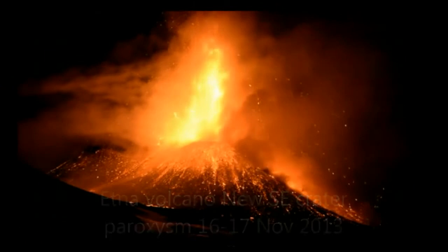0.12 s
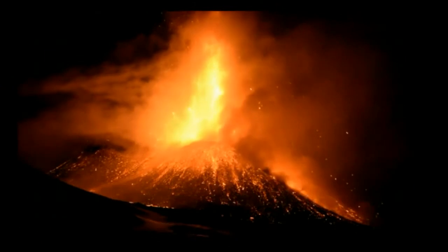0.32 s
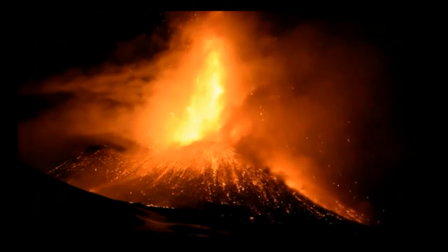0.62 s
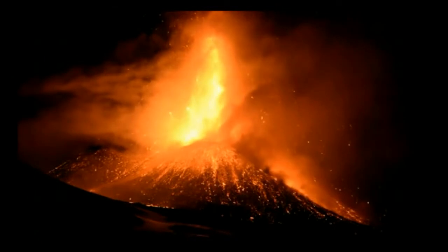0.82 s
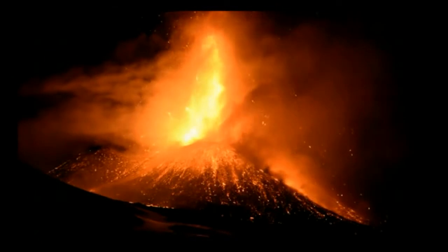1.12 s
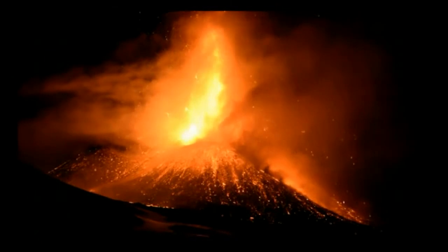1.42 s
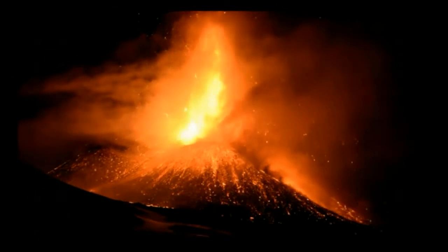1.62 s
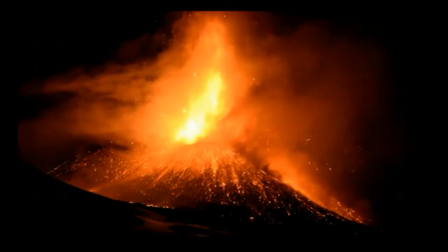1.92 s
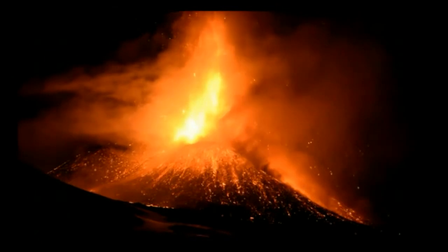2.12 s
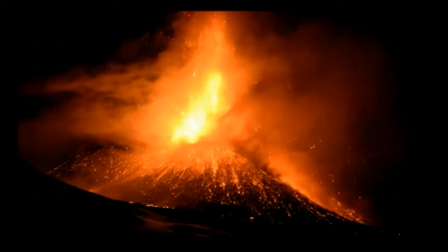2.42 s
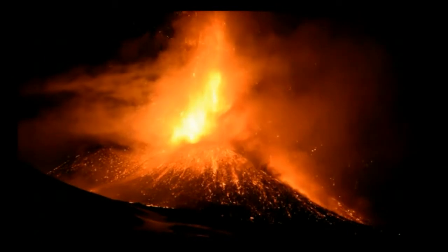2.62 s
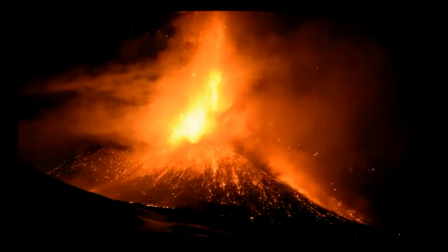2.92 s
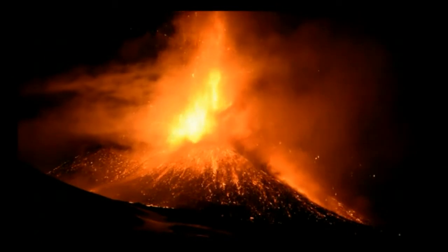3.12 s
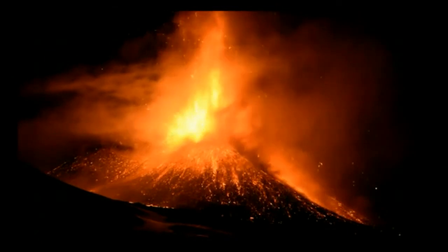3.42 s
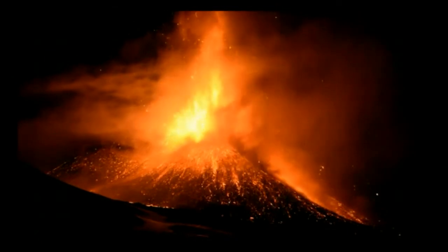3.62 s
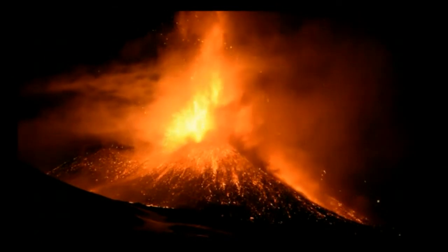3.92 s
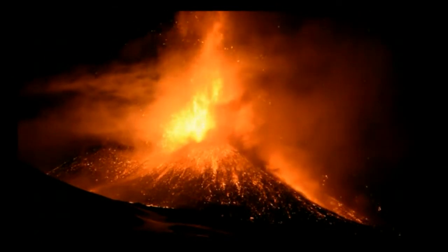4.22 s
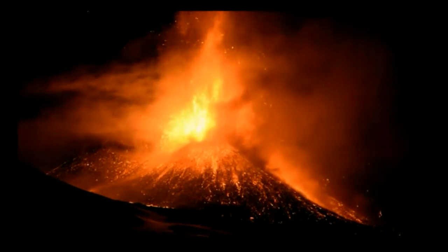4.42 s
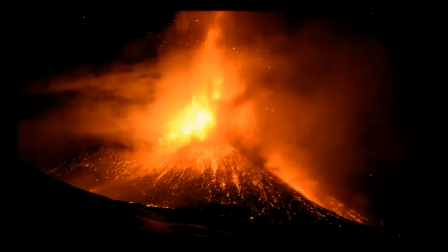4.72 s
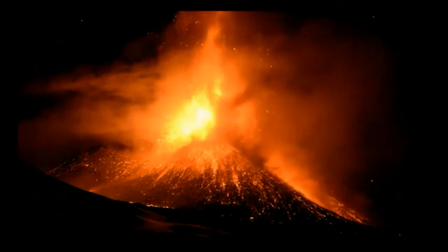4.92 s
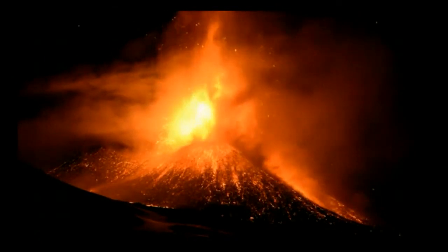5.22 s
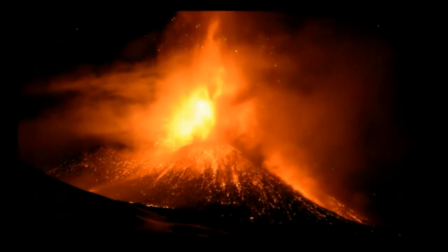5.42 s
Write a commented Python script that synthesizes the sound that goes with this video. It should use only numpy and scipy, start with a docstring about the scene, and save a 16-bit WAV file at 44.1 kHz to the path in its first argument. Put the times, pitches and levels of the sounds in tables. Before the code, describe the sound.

An open slope, with a lava fountain far off and loose cinders close to the microphone. Two or three heavy low thumps hit at once, with another at 0.14 s, over a dull throbbing rumble, faint jet and thin steady hiss. Gritty rustling, small crunches and pitched stone scrapes come at 0.3-0.7 s and around 1-1.4 s. Deep bursts strike at 1.53-1.61 s, 2.1 s, 2.4 s and 2.8 s; the strongest briefly duck everything else. A cluster at 2.98-3.01 s launches the jet into a full, hollow roar, pushing in uneven gusts, with ragged crackling rips until about 3.9 s. It then sags steadily, with lesser gusts near 4.1, 4.6 and 4.9 s. Near grit gets busier from 4.4 s, crunching brightly around 4.75-5 s. A boom at 5.19 s dips the sound; a loud, brittle crunch snaps at 5.46-5.5 s before the end.

```python
"""A lava fountain's gas jet, heard from a distant slope, roars, surges and gusts over a low rumble.
The jet is filtered noise and random clicks; bursting gas slugs send single pressure waves, some with a snap.
Close by, something gritty rustles and crunches, perhaps loose cinders: random clicks that stir short rings.
A thin hiss of filtered noise lies behind it. All but the waves dips briefly after the heaviest ones."""
import sys
import numpy as np
from scipy import signal
from scipy.fft import rfft, irfft, next_fast_len
from scipy.io import wavfile
from scipy.ndimage import uniform_filter1d

SR = 44100
rng = np.random.default_rng(int(sys.argv[2]) if len(sys.argv) > 2 else 0)


def materialize(psi):
    """Save the field psi as 16-bit PCM at rate SR to the path in sys.argv[1].

    A 1-D psi becomes a single channel; in a 2-D psi each row is a channel.
    """
    bounded = np.clip(np.atleast_2d(psi).T, -1, 1)
    quanta = np.round(bounded * 32767).astype(np.int16)
    wavfile.write(sys.argv[1], SR, quanta)


N = 246519
TIME = np.arange(N) / SR  # seconds
SURGE_DB = 10  # how far the surge lifts the jet above idle


def from_db(db):
    """Turn decibels into a gain."""
    return 10 ** (np.asarray(db) / 20)


def rms_one(x):
    """Scale a sound to an average power of one."""
    return x / np.sqrt(np.mean(x ** 2) + 1e-20)


def evened(x, span_s):
    """Divide by the local loudness, so the power stays near one from each short span to the next."""
    power = uniform_filter1d(x ** 2, int(span_s * SR) + 1)
    return x / np.sqrt(np.abs(power) + 1e-9)


def in_time(rows):
    """Read each column of a table at every sample, with straight lines between the rows."""
    seconds, *columns = np.transpose(rows)
    return [np.interp(TIME, seconds, column) for column in columns]


def drift(rate):
    """A smooth random wander of spread about 1; a higher rate changes faster."""
    step = 40  # computed on every 40th sample only, then joined by lines
    r = np.exp(-2 * np.pi * rate * step / SR)
    noise = rng.standard_normal(N // step + 2002)
    slow = signal.lfilter([1], [1, -2 * r, r * r], noise)[2000:]  # skip the filter's start
    return np.interp(np.arange(N) / step, np.arange(len(slow)), rms_one(slow))


def colour(x, spectrum):
    """Filter to a spectrum without any sound before its cause (minimum phase); white noise keeps its power."""
    size = 2 * next_fast_len(N // 2 + SR // 20, real=True)
    hz, db = np.transpose(spectrum)
    grid = np.maximum(np.arange(size // 2 + 1) * SR / size, 1)
    gain = rms_one(from_db(np.interp(np.log(grid), np.log(hz), db)))
    # folding the cepstrum forward in time gives the minimum phase
    cepstrum = irfft(np.log(gain))
    cepstrum[1:size // 2] *= 2
    cepstrum[size // 2 + 1:] = 0
    return irfft(rfft(x, size) * np.exp(rfft(cepstrum)))[:N]


def resonance(x, hz, width_hz):
    """Ring at one pitch (two poles), with gain 1 at the peak; a wider resonance dies sooner."""
    r = np.exp(-np.pi * width_hz / SR)
    top = np.array([1, 0, -1]) * (1 - r * r) / 2
    return signal.lfilter(top, [1, -2 * r * np.cos(2 * np.pi * hz / SR), r * r], x)


def grains(per_s, spread_db):
    """Random clicks of either sign and random size, scaled to unit power."""
    sizes = from_db(spread_db * np.minimum(rng.exponential(1, N), 4))
    signs = rng.choice([-1, 1], N)
    return rms_one(sizes * signs * (rng.random(N) < per_s / SR))


def burst(s, length, rise_s, fall_s):
    """An envelope that rises up to time s, holds for the length and falls."""
    age = TIME - s
    rise = np.minimum(age, 0) / rise_s
    fall = np.maximum(age - length, 0) / fall_s
    return np.exp(np.maximum(rise - fall, -20))


def surge_db(start_s=3.025, rise_s=0.17, sag_db_per_s=3):
    """The jet's strength above its idle level: a quick rise, then a steady sag."""
    age = TIME - start_s
    return SURGE_DB * np.clip(age / rise_s, 0, 1) - sag_db_per_s * np.maximum(age - rise_s, 0)


def roar(idle_db=-31, level_db=-0.5, flutter_db=0.5, pops_db=-6, even_s=0.091):
    """Turbulence mixed with countless small bursts; the air has swallowed their treble."""
    # Each row: frequency in Hz, relative strength in dB per Hz.
    spectrum = [(120, -25.5), (220, -16), (285, -2.5), (350, 1), (440, -6), (580, -9), (680, -18),
                (860, -21), (1100, -35), (1500, -53), (2500, -51.5), (9000, -70)]
    pops = from_db(pops_db) * grains(per_s=250, spread_db=3.5)
    gas = colour(rng.standard_normal(N) + pops, spectrum)
    jet_db = idle_db + surge_db() + level_db + flutter_db * drift(rate=8.1)
    return from_db(jet_db) * evened(gas, even_s)


def throat(level_db=-40.0, follows=1.51, hz=390, width_hz=200):
    """Driven hard, the jet rings the vent's throat in quick, uneven, soft-edged puffs."""
    soften = signal.butter(2, 900, fs=SR, output="sos")
    puffs = signal.sosfilt(soften, grains(per_s=150, spread_db=2.0))
    ring = resonance(resonance(puffs, hz, width_hz), hz, width_hz)
    # follows: dB of ringing per dB of surge
    return from_db(level_db + follows * surge_db()) * evened(ring, span_s=0.041)


def gusts(rise_s=0.019, fall_s=0.019, lull_db=-1.5):
    """The jet pushes in lumps and slackens between them; a gain."""
    # Gusts riding on the surge. Each row: start in seconds, length in seconds, push in dB above the lull.
    pushes = [(3.25,0.12,3.5),(3.49,0.04,2.5),(3.656,0.13,2.5),(4.14,0.049,1.5),(4.62,0.027,1.5),(4.933,0.078,2.5),(5.14,0.03,1)]
    push_db = sum(db * burst(s, length, rise_s, fall_s) for s, length, db in pushes)
    return from_db(lull_db * surge_db() / SURGE_DB + push_db)


def crackle(level_db=-61, follows=0.11, hz=950, width_hz=900):
    """Scattered small shocks in the jet crackle, louder as it surges and dulled by the air."""
    shocks = resonance(grains(per_s=90, spread_db=3.0), hz, width_hz)
    air = signal.butter(3, 2000, fs=SR, output="sos")
    return from_db(level_db + follows * surge_db()) * rms_one(signal.sosfilt(air, shocks))


def volleys(level_db=-2):
    """Now and then shocks tear out of the surge in a bunch, as a short ragged rip."""
    # Each row: start in seconds, length in seconds, level in dB before the shared level_db.
    rips = [(3.182,0.0045,-30),(3.235,0.0025,-27),(3.274,0.0038,-33),(3.311,0.0047,-36),(3.353,0.014,-33),(3.408,0.0049,-32),(3.457,0.0025,-31),(3.495,0.018,-37),(3.65,0.013,-44),(3.699,0.011,-32.5),(3.728,0.0038,-31.5),(3.752,0.0034,-33),(3.79,0.003,-36),(3.869,0.0033,-32.5),(4.149,0.0025,-31)]
    # Each row: frequency in Hz, relative strength in dB per Hz.
    spectrum = [(250, -3.5), (600, 14), (950, 4.5), (1400, -3.5), (2400, -12.5), (4000, -18.5),
                (9000, -22.5), (15000, -35)]
    force = sum(from_db(db + level_db) * burst(s, length, rise_s=0.00039, fall_s=0.0012)
                for s, length, db in rips)
    shocks = evened(grains(per_s=2500, spread_db=3.0), span_s=0.006)
    return colour(force * shocks, spectrum)


def blasts(level_db=-1, crack_db=3, crack_hz=740, crack_width_hz=720,
           snap_db=1, snap_s=0.000083, tail_db=-17, tail_s=0.00079):
    """Slugs burst: a crest between two troughs; some also crack and snap at the top, as their row says."""
    # Pressure waves. Each row: time of the crest in seconds, peak in dB, length of the crest in seconds,
    # crack in dB, snap in dB; level_db, crack_db and snap_db are added to the three levels.
    slugs = [(0.0133,-15.5,0.0023,-49,-39),(0.0176,-7.5,0.00099,-20,-40),(0.031,-14,0.001,-42,-65),(0.1439,-12.5,0.0011,-29,-44),(1.533,-8.5,0.0018,-41,-29),(1.5527,-12,0.0025,-21.5,-14.5),(1.6148,-19.5,0.0026,-50,-60),(2.094,-9.5,0.0013,-29.5,-53),(2.398,-16,0.0023,-45,-15.5),(2.7907,-16,0.0017,-47,-47),(2.9751,-12,0.0018,-43,-12.5),(2.9939,-8.5,0.0013,-23,-19.5),(3.007,-12,0.0021,-28,-29),(3.1835,-15.5,0.0024,-38,-20.5),(3.238,-20,0.0029,-42,-17.5),(4.9275,-18,0.0014,-47,-50),(5.1888,-13.5,0.0023,-26,-19)]
    # The snap's colour. Each row: frequency in Hz, relative strength in dB per Hz.
    snap_spectrum = [(1500, -4), (3200, -1.5), (5000, -6.5), (7500, -0.5), (13000, -3), (16000, 6.5)]
    waves, fronts, snaps = np.zeros((3, N))
    for s, peak_db, crest_s, front_db, top_db in slugs:
        near = np.abs(TIME - s) < .02
        age = TIME[near] - s
        u = (2 * age / crest_s) ** 2
        waves[near] += from_db(peak_db + level_db) * (1 - u) * np.exp(-u / 2)
        fronts[round(s * SR)] += from_db(front_db + crack_db) * SR / (np.pi * crack_width_hz)
        # a very short snap with a faint, longer tail, on both sides of the crest
        fade = np.exp(-np.abs(age) / snap_s) + from_db(tail_db) * np.exp(-np.abs(age) / tail_s)
        snaps[near] += from_db(top_db + snap_db) * fade
    crack = resonance(resonance(fronts, crack_hz, crack_width_hz), crack_hz, crack_width_hz)
    snap_noise = snaps * rng.choice([-1, 1], N)
    return ground_echo(waves + crack) + colour(snap_noise, snap_spectrum)


def ground_echo(x, lag_s=0.00548, echo_db=-11):
    """The slope sends a weaker copy just after the direct wave."""
    return x + from_db(echo_db) * np.interp(TIME - lag_s, TIME, x, left=0)


def dips(attack_s=0.03, recovery_s=0.23):
    """After a heavy wave all other sound drops quickly and creeps back; a gain."""
    # Each row: start in seconds, depth in dB (recovery starts at once, so the dip is a little shallower).
    heavy_waves = [(0.02, 3.5), (0.145, 0.5), (1.556, 7.5), (2.094, 2.5), (3.01, 1), (5.188, 8.5)]
    depth_db = np.zeros(N)
    for s, dip_db in heavy_waves:
        age = np.maximum(TIME - s, 0)
        dip = dip_db * np.minimum(age / attack_s, 1) * np.exp(-age / recovery_s)
        depth_db = np.maximum(depth_db, dip)  # where dips overlap, the deeper one counts
    return from_db(-depth_db)


def rumble(level_db=4.0, flutter_db=3.0):
    """Large eddies and dull thuds from the vent, as low-filtered random clicks."""
    # The vent's low throb. Each row: time in seconds, level in dB before level_db and the flutter.
    throb = [(0.0, -40), (0.5, -47.5), (1.17, -49), (1.45, -39), (1.82, -45), (3.22, -45.5), (3.38, -41),
             (4.5, -40.5), (5.26, -42.5), (5.59, -42.5)]
    # Each row: frequency in Hz, relative strength in dB per Hz.
    spectrum = [(12, -48), (28, -35), (38, -48), (60, -19.5), (95, -2.5), (128, 3.5), (160, 4), (210, -5.5),
                (300, -36.5), (600, -41), (2000, -100)]
    vent_db, = in_time(throb)
    thuds = grains(per_s=220, spread_db=0.0)
    return from_db(level_db + vent_db + flutter_db * drift(rate=6.2)) * colour(thuds, spectrum)


def grit(coarse, fine, ring_db):
    """Coarse grains knock low, fine ones scratch high; both stir a few short rings."""
    # Colours of the two grain sizes. Each row: frequency in Hz, relative strength in dB per Hz.
    coarse_spectrum = [(500, -51), (850, 6), (1250, 5), (1650, 4.5), (2000, -0.5), (2300, -0.5), (2550, 2),
                       (3100, -9), (4500, -10.5), (14000, -70)]
    fine_spectrum = [(1500, -11), (3000, -6), (4150, -3.5), (4550, 5.5), (5600, -0.5), (7600, -5),
                     (8200, -10), (9300, -10), (10300, -27.5), (12000, -15.5), (16000, -59.5)]
    # The rings and the low knock. Each row: pitch in Hz, width in Hz, gain in dB before ring_db.
    modes = [(880, 147, 9.5), (1637, 25, 0), (2487, 40, 0), (4980, 22, 4), (5080, 11, 0), (6200, 75, 0)]
    body = colour(coarse, coarse_spectrum) + colour(fine, fine_spectrum)
    rings = sum(from_db(db + ring_db) * resonance(body, hz, width) for hz, width, db in modes)
    return body + rings


def sliding(coarse_db=-3, fine_db=-0.5, flutter_db=1.78):
    """A soft rustle of dense grains, overlapping slides adding in power: the coarse and fine clicks."""
    # Long creeps and short rushes. Each row: start in seconds, length in seconds,
    # coarse level in dB, fine level in dB, before coarse_db, fine_db and the flutter.
    slides = [(0, 0.68, -58, -60), (0.296, 0.13, -50.5, -59), (0.733, 2.46, -55.5, -56),
              (1.434, 0.077, -58, -73), (2.42, 0.46, -50.5, -52.5), (3.334, 0.02, -56, -57.5),
              (3.987, 1.9, -55.5, -56), (4.216, 0.086, -47.5, -58), (4.857, 0.23, -46, -49),
              (5.537, 0.05, -46, -51.5)]
    power = sum((from_db([[low], [high]]) * burst(s, length, rise_s=0.11, fall_s=0.12)) ** 2
                for s, length, low, high in slides)
    coarse, fine = np.sqrt(power)
    uneven = flutter_db * drift(rate=15.0)
    return np.array([coarse * from_db(coarse_db + uneven) * grains(per_s=2200, spread_db=-0.5),
                     fine * from_db(fine_db + uneven) * grains(per_s=14000, spread_db=3.0)])


def crunching(coarse_db=0.0, fine_db=-7.0, jerk_db=6.0, dull_hz=7500):
    """Grit gives way in short jerky bursts with the treble cut: the coarse and fine clicks."""
    # Each row: start in seconds, length in seconds, coarse level in dB, fine level in dB,
    # before coarse_db and fine_db.
    crunches = [(0.322,0.026,-54,-41),(0.481,0.0031,-38,-33.5),(0.697,0.042,-65,-49),(0.957,0.0034,-52,-38),(1.397,0.0064,-52,-53),(1.522,0.0018,-41.5,-37),(2.334,0.0014,-41.5,-36.5),(2.432,0.0026,-54,-39),(2.472,0.0021,-39.5,-36),(2.625,0.004,-46.5,-52),(2.782,0.0024,-37.5,-34.5),(2.907,0.0076,-45,-35.5),(3.141,0.034,-55,-43),(4.11,0.003,-58,-38),(4.444,0.0088,-42.5,-36.5),(4.502,0.0074,-41,-41),(4.748,0.011,-44,-30),(4.818,0.013,-44,-31),(4.949,0.007,-44,-29.5),(4.968,0.0026,-39,-28.5),(5.0,0.0021,-46,-28),(5.269,0.0023,-48,-37),(5.447,0.011,-45,-42),(5.456,0.0045,-40,-34),(5.461,0.019,-31.5,-22),(5.482,0.0047,-26.5,-24.5),(5.492,0.0041,-26,-24),(5.494,0.024,-46,-36.5),(5.557,0.0051,-43,-43)]
    force = sum(from_db([[coarse + coarse_db], [fine + fine_db]]) * burst(s, length, rise_s=0.0003, fall_s=0.0029)
                for s, length, coarse, fine in crunches)
    jerks = from_db(jerk_db * drift(rate=360))
    clicks = force * [evened(jerks * grains(per_s=6000, spread_db=1.5), span_s=0.004) for _ in force]
    return signal.sosfilt(signal.butter(2, dull_hz, fs=SR, output="sos"), clicks)


def grating(level_db=-1, width_hz=270, upper_hz=3580, upper_width_hz=260, upper_db=-9, scratch_db=-6):
    """Stones grate: quick slips ring at a wavering pitch, with a fainter mode above and a broad scratch."""
    # Each row: start in seconds, length in seconds, level in dB before level_db, pitch in Hz before wavering.
    grates = [(0.292,0.033,-48,1560),(0.398,0.015,-42,1630),(0.667,0.013,-42,1650),(0.694,0.003,-44,1970),(0.703,0.01,-48,1780),(0.721,0.0066,-49,1860),(0.915,0.005,-47.5,1810),(0.957,0.0059,-45,1490),(1.087,0.004,-50,1570),(1.398,0.0042,-46,1500),(1.405,0.0039,-38.5,1480),(2.214,0.0034,-46.5,1340),(4.505,0.0022,-41,1960)]
    slips = grains(per_s=3000, spread_db=1.5)
    jerks = rms_one(from_db(2.5 * drift(rate=300)))
    wavering = TIME + np.cumsum(0.04 * drift(rate=30)) / SR  # time runs about 4 % fast or slow

    def ring(hz, width):
        """A steep-sided, wavering ring of even power."""
        steady = resonance(resonance(slips, hz, width), hz, width)
        return evened(np.interp(wavering, TIME, steady), span_s=0.008)

    upper = from_db(upper_db) * ring(upper_hz, upper_width_hz)
    band = signal.butter(2, [1200, 6000], "band", fs=SR, output="sos")
    scratch = from_db(scratch_db) * rms_one(signal.sosfilt(band, slips))
    total = np.zeros(N)
    for s, length, db, hz in grates:
        envelope = from_db(db + level_db) * burst(s, length, rise_s=0.001, fall_s=0.0034)
        total += envelope * (ring(hz, width_hz) + upper + scratch)
    return jerks * total


def chipping(width_hz=1050):
    """A brittle piece fractures in a few milliseconds and rings briefly at its own pitch."""
    # Each row: start in seconds, level in dB ahead of the last ring, pitch in Hz.
    chips = [(4.9645,-26.5,4850),(5,-29,4770),(5.461,-29,4800),(5.471,-24,5170),(5.4802,-24,4850),(5.49,-19,4840)]
    splinters = grains(per_s=6000, spread_db=1.5)
    total = np.zeros(N)
    for s, db, hz in chips:
        pitched = evened(resonance(splinters, hz, width_hz), span_s=0.003)
        fracture = burst(s, length=0.003, rise_s=0.0003, fall_s=0.0016) * pitched
        total += from_db(db) * resonance(fracture, hz, width_hz)
    return total


def thin_hiss(level_db=-63, sinks=0.17):
    """Steady filtered noise that sinks a little as the jet surges."""
    # Each row: frequency in Hz, relative strength in dB per Hz.
    spectrum = [(100, -28), (2000, 7.5), (4200, -7), (4420, 18.5), (5000, 4.5), (9000, 6), (10300, -2.5),
                (12000, -0.5), (13800, 1), (16000, -26)]
    # sinks: dB of hiss lost per dB of surge
    return from_db(level_db - sinks * surge_db()) * colour(rng.standard_normal(N), spectrum)


def scene():
    """The far volcano, the near grit and the hiss, all dipping after the heavy pressure waves."""
    volcano = gusts() * (roar() + throat()) + crackle() + volleys() + rumble()
    rustle = grit(*sliding(), ring_db=-8)
    crunch = grit(*crunching(), ring_db=-2.5)
    ground = rustle + crunch + grating() + chipping()
    return (blasts() + dips() * (volcano + ground + thin_hiss()))[None]


def record(dry):
    """Cut the sound steeply above 15800 Hz."""
    return signal.sosfilt(signal.ellip(10, .1, 80, 15800, fs=SR, output="sos"), dry)


dry = scene()
out = record(dry)
materialize(out)
```